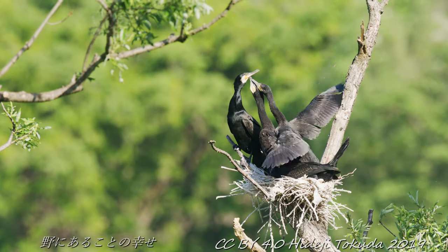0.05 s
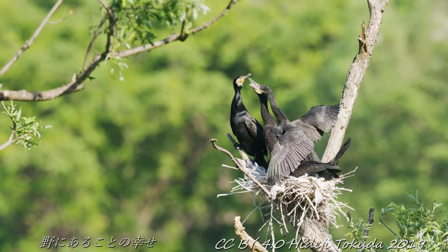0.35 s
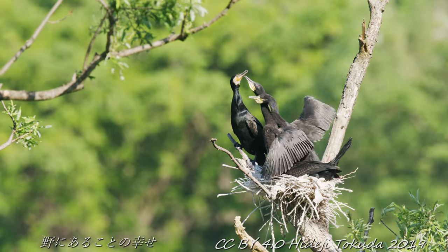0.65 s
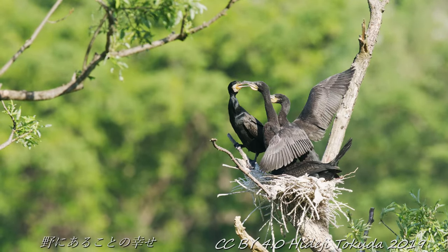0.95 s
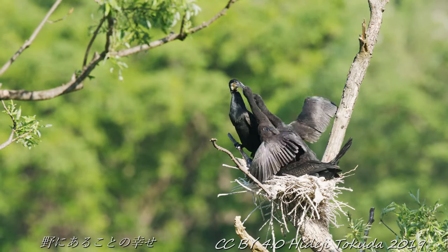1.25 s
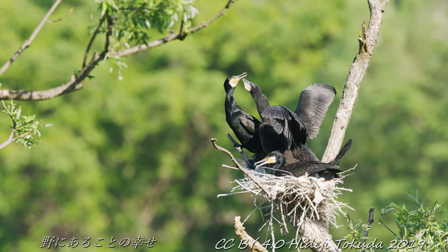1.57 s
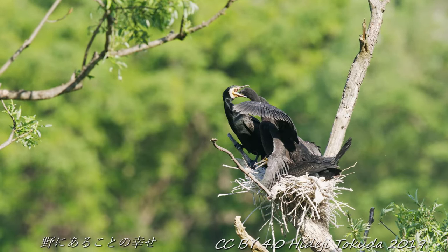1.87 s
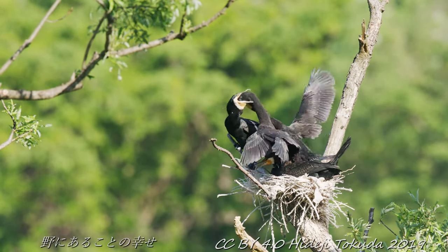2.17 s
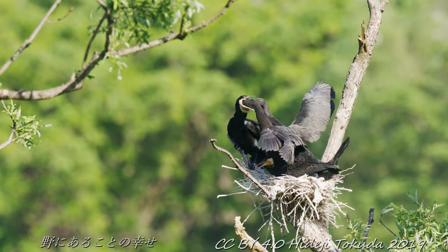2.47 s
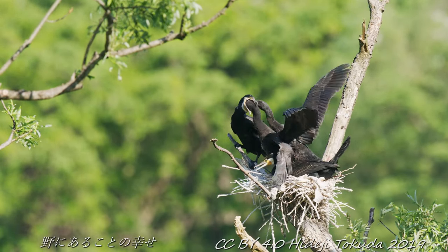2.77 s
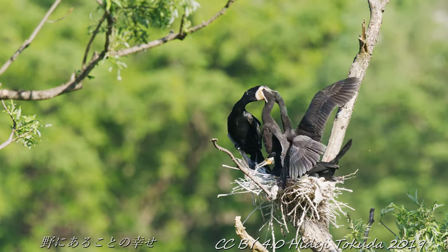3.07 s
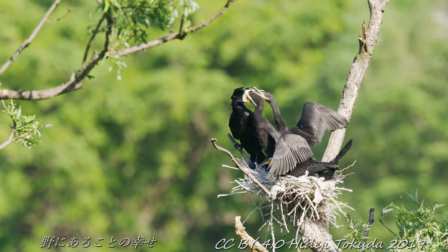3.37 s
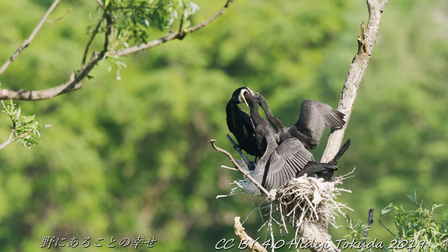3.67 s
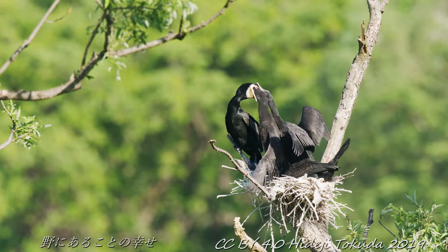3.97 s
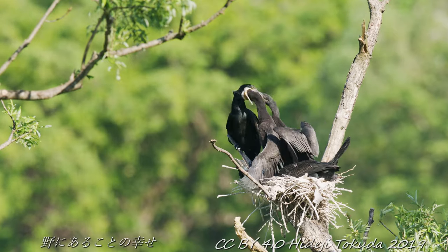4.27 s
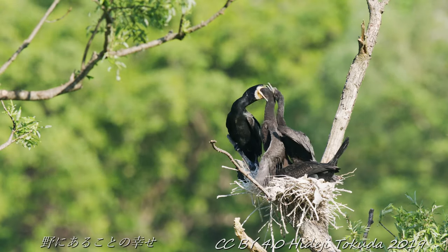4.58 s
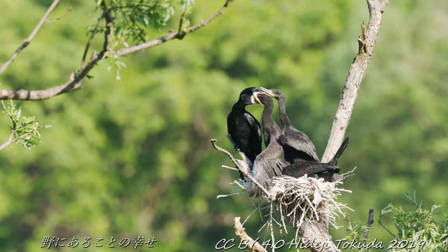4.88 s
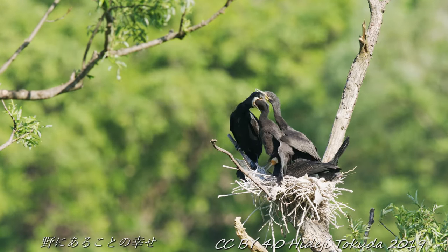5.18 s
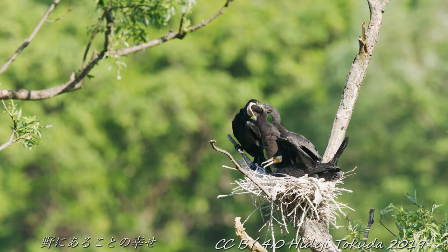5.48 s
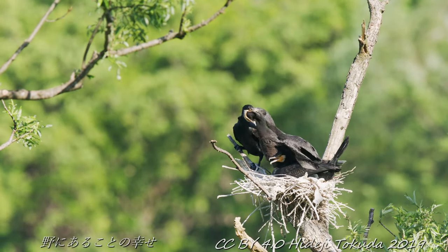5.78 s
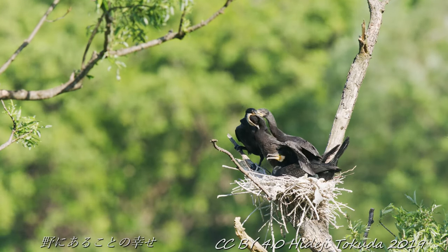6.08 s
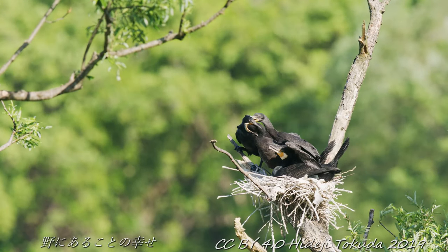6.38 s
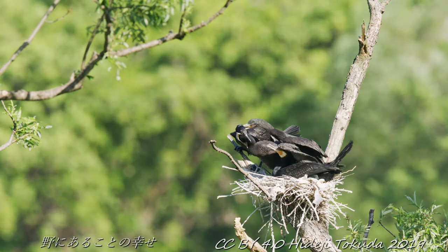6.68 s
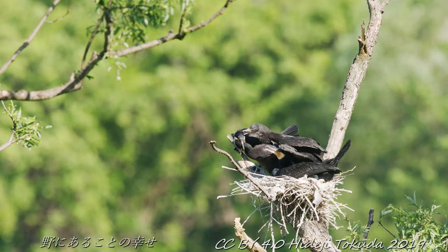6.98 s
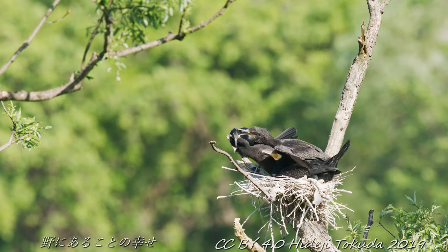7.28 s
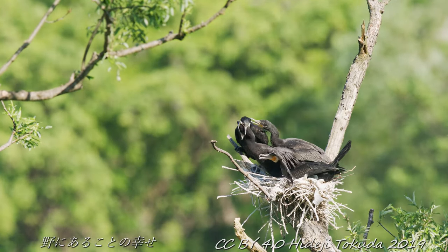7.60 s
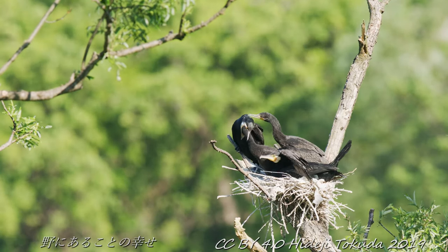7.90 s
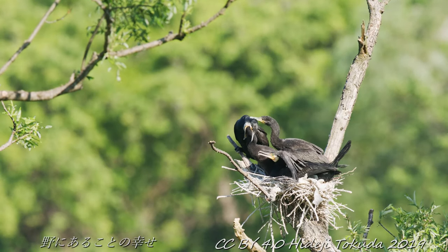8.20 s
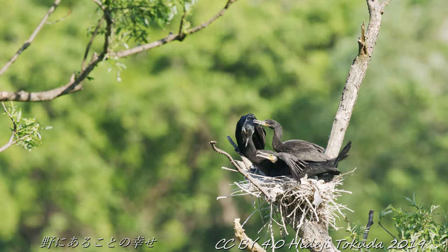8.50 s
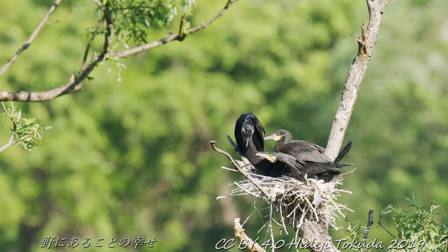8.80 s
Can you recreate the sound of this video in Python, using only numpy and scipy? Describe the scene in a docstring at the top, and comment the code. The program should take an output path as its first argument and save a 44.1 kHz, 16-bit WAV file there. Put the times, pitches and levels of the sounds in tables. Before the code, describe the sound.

Among trees, some way from a cormorant colony, a low buffet of wind opens and dies away while young birds are already squealing. Their thin whistles and harsh begging calls come several times a second throughout, joined by nasal whines from older young and soft distant piping. In the later part the massed chorus eases a little and a few quick high yelps appear. A steady, far-off rush continues beneath the lightly echoing calls.

```python
"""Among trees, some way from a cormorant colony: chicks beg with thin, gliding, often hoarse squeals.
Older young whine lower, far nests pipe, and the rest of the colony blurs into a rasping chorus.
Each call is a gliding oscillation of the syrinx, made hoarse by random modulation of pitch and level.
Trunks and foliage scatter a short echo. Under it all lies a steady outdoor rush, and a breeze
buffets the microphone at first."""
import sys
import numpy as np
from scipy import signal
from scipy.fft import rfft, irfft, next_fast_len
from scipy.io import wavfile
from scipy.ndimage import map_coordinates

SR = 44100
rng = np.random.default_rng(int(sys.argv[2]) if len(sys.argv) > 2 else 0)


def dump_mix(stems):
    """Bounce the given channels to the path in sys.argv[1] as a 16-bit WAV at rate SR."""
    frames = np.atleast_2d(stems).T  # one column per channel
    limited = np.clip(frames, -1, 1)  # hard clip at full scale
    pcm = np.round(limited * 32767).astype(np.int16)
    wavfile.write(sys.argv[1], SR, pcm)


N = 399105

# Levels are relative within each table; f of a call is its pitch at mid-length.
# loudest begging squeals: t/s, length/s, f/Hz, glide/octaves, level/dB, hoarseness (0 = clear)
SQUEALS = [(0.142, .06, 2330, 0.33, -61, 0.5), (0.443, .07, 2500, 0.28, -55.5, 0.4),
           (0.491, 0.12, 2930, -0.25, -54, 0.07), (0.72, .13, 3160, -0.15, -57, .05),
           (.83, .1, 3230, 0.46, -59.5, 0.28), (0.954, 0.084, 2950, 0.075, -56.5, 0.1),
           (1.041, 0.057, 2945, -.29, -56, 0.6), (1.079, 0.073, 2486, .05, -56.5, .45),
           (1.17, 0.096, 3154, -0.063, -55.5, 0.43), (1.263, 0.08, 2616, 0, -55.5, 0.2),
           (1.341, 0.085, 3174, -0.059, -54, 0.7), (1.37, .035, 4400, -0.25, -64, .4),
           (1.455, 0.19, 3710, -0.053, -64.5, 0.4), (1.465, 0.037, 2810, 0.0093, -55.5, 0),
           (1.545, 0.088, 3140, -0.21, -57.5, 0.1), (1.69, .12, 2960, 0.66, -55, 0.73),
           (1.838, 0.072, 2945, -0.19, -54, .15), (2.04, .11, 3283, 0.14, -52.5, 0.25),
           (2.168, 0.082, 2820, 0.39, -53, .45), (2.267, 0.038, 3050, .17, -51, 0),
           (2.584, .035, 3580, -0.46, -60, .8), (2.656, 0.14, 2714, .38, -51.5, 0.72),
           (2.701, 0.049, 2934, -0.039, -47, 0.4), (3.07, 0.054, 3140, 0.071, -59.5, 0.3),
           (3.203, .1, 2570, 0.37, -56, 0.3), (3.205, 0.093, 2865, .18, -50, .2),
           (3.405, .089, 2285, -0.035, -57, 0.53), (3.452, 0.079, 3050, -.07, -57.5, 0),
           (3.678, 0.038, 4260, .15, -61, .9), (3.718, 0.074, 2850, 0.18, -49.5, 0),
           (3.809, 0.085, 2853, -0.016, -52, .55), (3.969, 0.1, 4580, -0.025, -68, 0.34),
           (4.148, .09, 2634, .25, -55, 0.63), (4.439, 0.057, 3246, .25, -55.5, 0.36),
           (4.59, 0.11, 2966, -0.072, -53.5, 0.29), (4.633, 0.093, 3970, 0, -64, 0.2),
           (4.648, 0.041, 2635, -0.11, -53.5, .15), (4.725, 0.064, 2644, -0.046, -49, 0.42),
           (4.764, 0.11, 2350, 0.2, -50.5, 0.4), (4.853, .045, 2840, -0.0053, -50, 0.14),
           (4.97, 0.047, 2810, -.12, -51, 0.47), (5.175, 0.17, 2696, 0.051, -55.5, 0.3),
           (5.329, .16, 2556, -0.073, -58, 0.25), (5.412, 0.046, 3140, 0.082, -58.5, 0.25),
           (5.472, 0.11, 2390, 0.35, -50.5, .35), (5.542, 0.068, 3020, .1, -50.5, 0.27),
           (5.632, 0.061, 3045, -0.15, -50.5, 0.2), (5.719, 0.11, 2350, -0.016, -56, 0.03),
           (6.19, 0.094, 2886, 0.2, -54, 0.8), (6.29, 0.12, 2920, 0.16, -53, 0.67),
           (6.522, .085, 3190, .12, -51, 0.05), (6.597, 0.12, 3075, 0.081, -53.5, 0.08),
           (6.721, 0.17, 3106, .1, -54.5, 0.42), (6.857, 0.081, 2826, -0.062, -54.5, 0.4),
           (7.237, 0.077, 3490, -0.14, -59, 0.25), (7.321, 0.081, 2370, .06, -59, 0.2),
           (7.34, 0.058, 2880, 0.29, -55, 0.74), (7.424, .034, 2910, 0.12, -53, 0.14),
           (7.506, 0.11, 2990, 0.081, -56, 0.44), (7.558, .07, 5020, -0.079, -68, 1),
           (7.778, 0.051, 2950, 0.038, -53.5, 0.4), (7.832, 0.056, 2850, .02, -49.5, 0.64),
           (8.072, 0.1, 3900, 0.36, -67, 0.23), (8.175, 0.052, 2480, 0.28, -54.5, 0.42),
           (8.227, 0.076, 2400, 0.08, -52, .2), (8.253, 0.043, 5340, 0, -65.5, 1.05),
           (8.286, 0.076, 2870, 0.019, -54, 0.04), (8.396, 0.069, 2660, .16, -54.5, 0.6),
           (8.503, 0.086, 2926, 0.033, -54, 0.88), (8.798, 0.049, 2350, 0.24, -56.5, 0.4),
           (8.83, 0.081, 2790, 0.055, -52.5, 0.1), (8.931, 0.069, 2910, -0.14, -50.5, .55)]
# yelps that shoot up and fall back: t/s, length/s, f/Hz, level/dB
YELPS = [(0.403, 0.18, 3690, -70), (6.054, 0.069, 4150, -68), (6.132, .054, 4000, -64),
         (6.37, 0.13, 4120, -64.5), (7.122, 0.067, 4010, -61.5), (7.786, 0.074, 4700, -69),
         (8.294, 0.066, 4010, -63), (8.395, .06, 4080, -67)]
# nasal whines: t/s, length/s, second harmonic f/Hz, glide/octaves, level/dB, lift of other harmonics/dB
WHINES = [(1.637, 0.035, 1925, -0.068, -60, -1), (2.11, 0.076, 2290, 0.15, -56.5, 3.5),
          (2.59, 0.053, 2160, 0.21, -55.5, 2), (3.121, 0.065, 2117, 0.18, -54, -2.5),
          (3.67, .19, 2208, 0.16, -55.5, -1), (4.191, 0.24, 2186, -0.061, -58.5, 5),
          (4.804, 0.189, 2170, -0.0089, -59.5, 6), (5.349, 0.057, 2160, -0.021, -60.5, -2),
          (6.125, 0.062, 2270, 0.107, -58, -13), (6.764, 0.076, 2235, 0.23, -58, -10),
          (7.434, 0.079, 2300, 0.17, -56.5, -5), (8.711, .07, 2186, -0.11, -62.5, -14)]
# surges of harsh begging: t/s, length/s, f/Hz, level/dB
RASPS = [(0.199, 0.23, 3024, -54), (0.375, .17, 1950, -58.5), (0.669, .14, 2396, -58),
         (0.843, 0.21, 3430, -61.5), (1.14, .17, 3000, -60.5), (1.619, 0.23, 3037, -56),
         (2.049, 0.26, 3690, -56.5), (2.709, .15, 3490, -57), (3.219, .22, 3440, -59),
         (3.593, 0.15, 3027, -51.5), (3.818, 0.31, 3126, -58.5), (4.137, .13, 2893, -55.5),
         (4.501, 0.26, 3060, -59.5), (5.15, .18, 3480, -58), (5.669, .23, 3196, -54.5),
         (6.016, .2, 3005, -56), (6.273, 0.22, 3560, -59.5), (6.842, .18, 3333, -53.5),
         (7.035, 0.073, 2950, -53.5), (7.27, .36, 3124, -57), (7.9, .3, 3300, -56.5),
         (8.291, .28, 3050, -60.5), (8.574, .18, 3490, -61), (8.881, 0.24, 2917, -57)]
# snapping stick: t/s, level/dB
TWIGS = [(1.045, -53)]
# piping from far nests: t/s, length/s, f/Hz, glide/octaves, level/dB
PIPES = [(0.042, 0.094, 983, -0.39, -60), (0.251, 0.27, 1580, .28, -65), (0.552, 0.2, 1416, -0.086, -59),
         (0.95, 0.097, 1640, -0.0091, -59.5), (1.204, .18, 1403, 0.093, -60.5),
         (1.497, 0.072, 1285, -0.0057, -61.5), (1.657, 0.21, 1432, -.15, -62.5),
         (1.957, 0.13, 1404, 0, -57.5), (2.412, 0.059, 1352, .28, -59.5), (2.913, 0.186, 1425, 0.057, -57),
         (3.484, 0.148, 1374, -0.002, -59.5), (4.069, 0.078, 1312, 0.072, -59),
         (4.697, .27, 1252, -.06, -65.5), (5.673, 0.08, 1030, -0.22, -60.5),
         (7.13, 0.092, 1550, 0.019, -62), (7.82, 0.11, 1570, 0.02, -61.5), (8.543, 0.1, 1525, .05, -62.5)]
# partials of each voice: multiple of the listed f, level/dB
SQUEAL_PARTIALS = [(1, 7), (2, -27.5)]
WHINE_PARTIALS = [(.5, -6), (1, 2), (1.5, -5), (2, -14)]
RASP_PARTIALS = [(1, 3.5), (1.25, -10.5), (1.5, -17), (2, -27)]
PIPE_PARTIALS = [(1, -0.5), (2, -8.5)]
# envelopes of the massed chicks, the far rush and the breeze: t/s, level/dB
COLONY_LEVEL = [(0, -56.5), (1.5, -57.5), (2, -54), (2.45, -55.5), (3.6, -56), (5.1, -56), (6, -60),
                (9, -61)]
RUSH_LEVEL = [(0.0, -64), (2.19, -61.5), (2.85, -63.5), (9.05, -59.5)]
BREEZE_LEVEL = [(0.0, -58), (0.05, -52.5), (1.86, -73), (4.96, -79), (7.59, -79), (7.86, -74.5),
                (9.05, -81)]
# low-pass responses of the older throat and of the path through the air: f/Hz, level/dB
WHINE_THROAT = [(4300, -1), (4900, -2.5)]
AIR_PATH = [(3800, 1.5), (4700, -4.5), (6000, -6.5), (9000, -17)]
# spectral shapes of chorus, rush, buffeting, leaves and recorder hiss: f/Hz, level/dB
CHORUS_SPECTRUM = [(700, -41), (1300, -9), (1900, -4), (2250, -5.5), (2950, -1), (3300, -1), (3800, -10.5),
                   (4600, -20.5), (7000, -45.5)]
RUSH_SPECTRUM = [(100, -20.5), (210, -28.5), (310, -12.5), (420, -11), (600, -4.5), (950, 1), (1500, -2),
                 (2000, -8), (3500, -15), (5000, -31), (9000, -55.5)]
BUFFET_SPECTRUM = [(15, 0.5), (28, -2.5), (48, -7), (70, -15), (110, -23.5), (200, -44), (500, -75)]
LEAF_SPECTRUM = [(1000, -20.5), (3000, 5.5), (6000, -2), (9000, -14), (14000, -36)]
HISS_SPECTRUM = [(1000, -3.5), (5000, -2), (8000, -2.5), (15500, -10.5)]


def syrinx(length, pitches, partials, hoarse, waver, flutter_hz, taper):
    """Modulated oscillation: a call of rms 1 glides through three pitches; hoarseness adds sidebands."""
    size = int(length * SR)
    glide = np.polyval(np.polyfit([0, .5, 1], pitches, 2), np.linspace(0, 1, size))
    hz = glide * (1 + waver * wobble(68.5, size) + 0.0394 * hoarse * wobble(799, size))
    phase = 2 * np.pi * np.cumsum(hz) / SR
    voice = sum(amp(db) * np.sin(multiple * phase) for multiple, db in partials)
    swell_db = 2.1 * wobble(43, size)  # the air pressure swells
    flutter_db = 6.1 * hoarse * wobble(flutter_hz, size)  # the membranes beat unevenly
    return unit(voice * amp(swell_db + flutter_db) * signal.windows.tukey(size, taper))


def contour(hz, glide, arch):
    """Pitch is logarithmic: start, middle and end f/Hz of a glide and an arch given in octaves."""
    return hz * 2.0 ** np.array([-glide / 2 - arch, 0, glide / 2 - arch])


def squeals(unarched_hz=3002):
    """Nearly sinusoidal oscillation: the nearest chicks whistle, and the tone breaks up when forced."""
    out = np.zeros(N)
    for s, length, hz, glide, db, hoarse in SQUEALS:
        arch = 0.0394 * np.tanh(12 * np.log2(hz / unarched_hz))  # high squeals arch, low ones sag
        pitches = contour(hz, glide, arch)
        voice = syrinx(length, pitches, SQUEAL_PARTIALS, hoarse, waver=0.0139, flutter_hz=390, taper=0.43)
        add(out, s, amp(db) * voice)
    return out


def yelps():
    """Frequency sweep: quick high calls rise and fall, all on the same steep arch."""
    out = np.zeros(N)
    for s, length, hz, db in YELPS:
        pitches = contour(hz, glide=0, arch=0.57)
        voice = syrinx(length, pitches, SQUEAL_PARTIALS,
                       hoarse=0.33, waver=0.0072, flutter_hz=800, taper=0.1)
        add(out, s, amp(db) * voice)
    return out


def whines():
    """Source and filter: older young send a low note, richer when nasal, through a throat that dulls it."""
    out = np.zeros(N)
    for s, length, hz, glide, db, lift_db in WHINES:
        partials = [(multiple, level + lift_db * (multiple != 1)) for multiple, level in WHINE_PARTIALS]
        pitches = contour(hz, glide, arch=0.0359)
        voice = syrinx(length, pitches, partials, hoarse=0.16, waver=0.0046, flutter_hz=160, taper=0.32)
        add(out, s, amp(db) * voice)
    return shaped(out, WHINE_THROAT)


def rasps(count=3, octaves_per_s=0.9):
    """Period doubling: partials between the harmonics roughen siblings' voices as they climb together."""
    out = np.zeros(N)
    for s, length, hz, db in RASPS:
        climb = contour(hz, octaves_per_s * length, arch=0)
        for rank, (late, *bends) in zip(np.linspace(-1, 1, count), rng.standard_normal((count, 4))):
            pitches = climb * np.exp(.11 * rank + .03 * np.array(bends))  # each on its own pitch
            voice = syrinx(length, pitches, RASP_PARTIALS,
                           hoarse=.5, waver=0.01604, flutter_hz=130, taper=0.26)
            add(out, s + .01 * late, amp(db) * voice / np.sqrt(count))
    return out


def twigs(t60=0.076):
    """Damped transient: a dry stick of the nest snaps with a tick of exponentially decaying noise."""
    out = np.zeros(N)
    t = np.arange(SR // 10) / SR
    for s, db in TWIGS:
        add(out, s, amp(db - 60 * t / t60) * noise(LEAF_SPECTRUM)[:len(t)])
    return out


def pipes():
    """Harmonic tones: a fundamental and its octave form the soft arched notes of farther nests."""
    out = np.zeros(N)
    for s, length, hz, glide, db in PIPES:
        pitches = contour(hz, glide, arch=0.0791)
        voice = syrinx(length, pitches, PIPE_PARTIALS,
                       hoarse=0.45, waver=0.012, flutter_hz=270, taper=0.26)
        add(out, s, amp(db) * voice)
    return out


def crowd(count, centre_hz, hoarse):
    """Incoherent superposition: squeals, mostly rising, at random times; the sum has rms 1."""
    out = np.zeros(N)
    starts = (np.arange(count) + rng.random(count)) * N / SR / count
    for s, (span, pitch, rise, arch) in zip(starts, rng.standard_normal((count, 4))):
        length = .11 * np.exp(.3 * span)
        slope = 0.04024 + .05 * rise
        pitches = centre_hz * np.exp(.15 * pitch + np.array([-slope, .03 * arch, slope]))
        voice = syrinx(length, pitches, [(1, 0)], hoarse, waver=0.01153, flutter_hz=300, taper=1)
        add(out, s - .05, voice)
    return unit(out)


def colony():
    """Many voices tend to noise: far chicks blur into a hiss, the next nests remain faint squeals."""
    voices = coloured(crowd(count=200, centre_hz=2596, hoarse=0.57), CHORUS_SPECTRUM)
    blur = noise(CHORUS_SPECTRUM)
    neighbours = coloured(crowd(count=60, centre_hz=2741, hoarse=0.18), CHORUS_SPECTRUM)
    return amp(envelope(COLONY_LEVEL) - 1.1) * (voices + amp(-0.4) * blur + amp(-9.5) * neighbours)


def tree_echo(x, t60):
    """Scattering: trunks and foliage return a diffuse echo that falls 60 dB in t60 seconds."""
    t = np.arange(SR // 2) / SR
    build_up = 1 - np.exp(-t / 0.0036)
    tail = rng.standard_normal(len(t)) * amp(-60 * t / t60) * build_up
    return signal.fftconvolve(x, tail / np.linalg.norm(tail))[:N]


def air():
    """Flow noise: wind or water rushes far off; a breeze buffets the microphone and stirs the leaves."""
    breeze_db = envelope(BREEZE_LEVEL)
    rush = amp(envelope(RUSH_LEVEL) + 3) * noise(RUSH_SPECTRUM)
    buffet = amp(breeze_db + 4.5 + 1.5 * wobble(9, N)) * noise(BUFFET_SPECTRUM)
    leaves = amp(0.24 * breeze_db - 58) * noise(LEAF_SPECTRUM)
    return rush + buffet + leaves


def amp(db):
    """Amplitude ratio of a level in decibels."""
    return 10 ** (np.asarray(db) / 20)


def unit(x):
    """Normalisation to rms 1."""
    return x / np.sqrt(np.mean(np.abs(x) ** 2) + 1e-20)


def envelope(points):
    """Linear interpolation of (t/s, level/dB) points to one level a sample."""
    s, db = np.transpose(points)
    return np.interp(np.arange(N) / SR, s, db)


def wobble(rate, size):
    """Smooth random modulation: a spline through rate knots a second."""
    return map_coordinates(rng.standard_normal(2048), [np.arange(size) * rate / SR], mode="wrap")


def filtered(x, response):
    """Linear filtering: the spectrum of x times a function of frequency."""
    size = next_fast_len(N + SR // 2)
    return irfft(rfft(x, size) * response(np.fft.rfftfreq(size, 1 / SR)), size)[:N]


def shaped(x, points):
    """Filtering by (f/Hz, level/dB) points joined on a logarithmic frequency axis."""
    f, db = np.transpose(points)
    return filtered(x, lambda hz: amp(np.interp(np.log(hz + 1), np.log(f), db)))


def coloured(x, spectrum):
    """Spectral shaping of x, at rms 1."""
    return unit(shaped(x, spectrum))


def noise(spectrum):
    """Gaussian noise of the given spectrum, at rms 1."""
    return coloured(rng.standard_normal(N), spectrum)


def add(track, s, sound):
    """Superposition of a sound on the track at time s."""
    part = track[max(0, round(s * SR)):][:len(sound)]
    part += sound[:len(part)]


def scene():
    """Superposition: near nests dulled by air absorption, far nests, their echo, chorus and moving air."""
    nests = amp(1) * squeals() + yelps() + amp(3.5) * whines() + amp(-1.5) * rasps() + twigs()
    near = shaped(nests, AIR_PATH)
    far = amp(2) * pipes()
    echo = tree_echo(amp(-8.5) * near + amp(-14.5) * far, t60=0.5)
    return (near + far + echo + colony() + air())[None]


def record(dry):
    """Noise floor and band limit: the recorder adds a faint hiss and cuts off the highest treble."""
    hiss = amp(-83.5) * noise(HISS_SPECTRUM)
    return filtered(dry[0] + hiss, lambda hz: hz < 15750)[None]


dry = scene()
out = record(dry)
dump_mix(out)
```